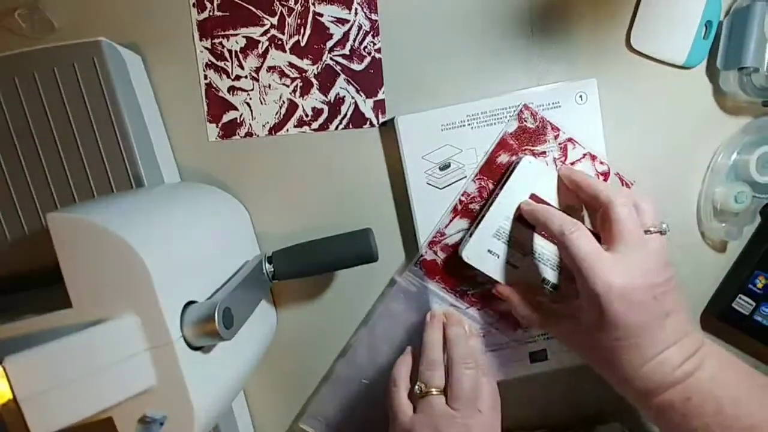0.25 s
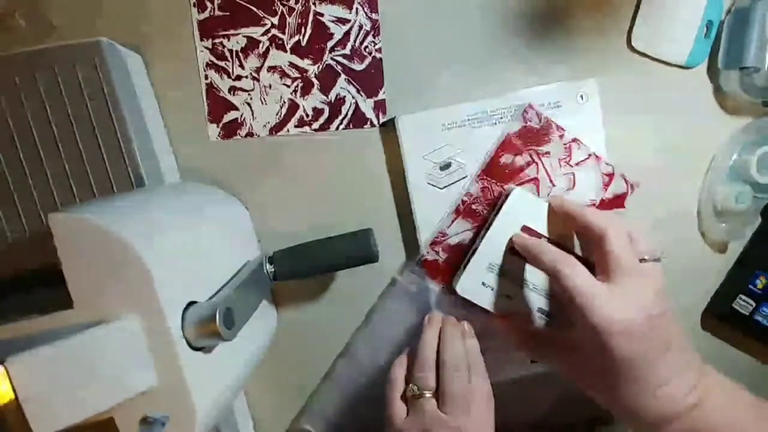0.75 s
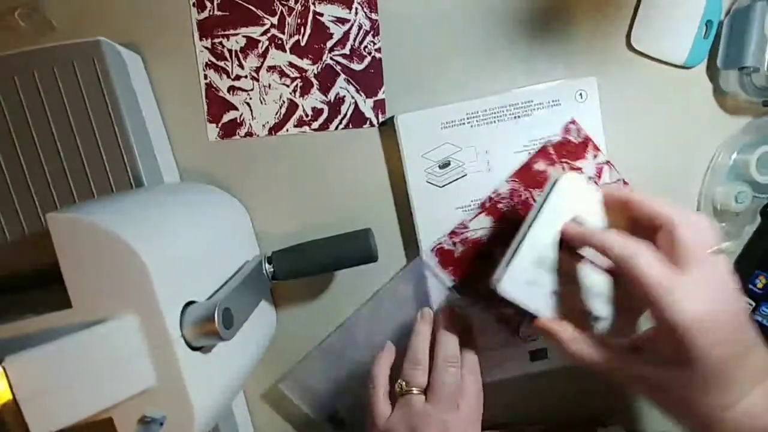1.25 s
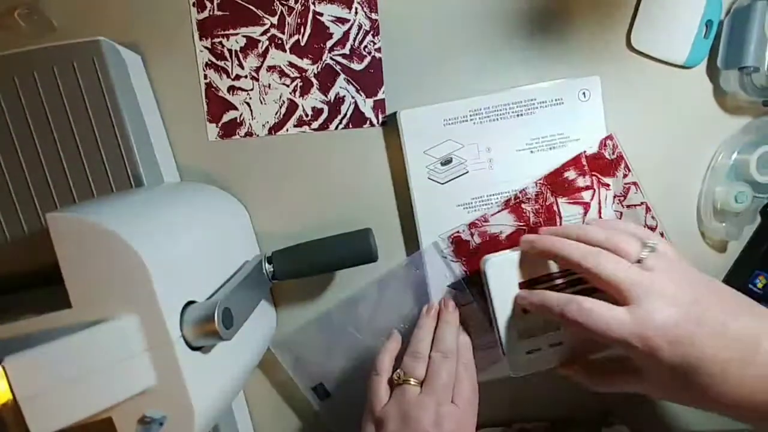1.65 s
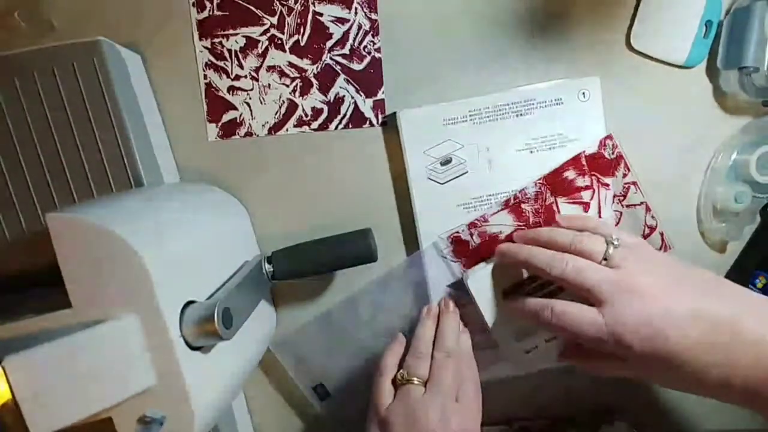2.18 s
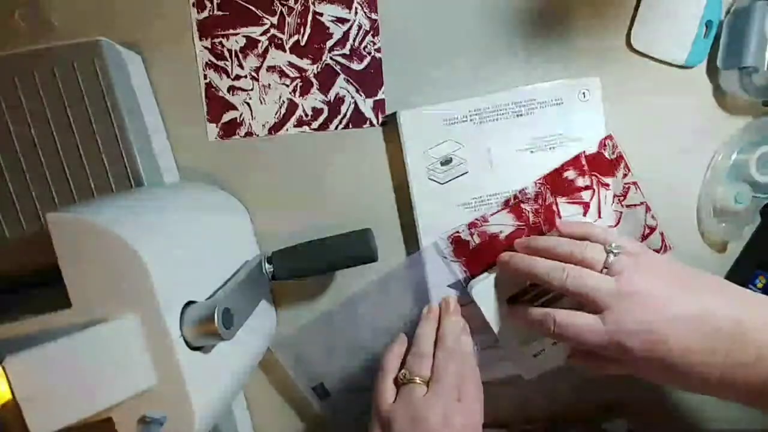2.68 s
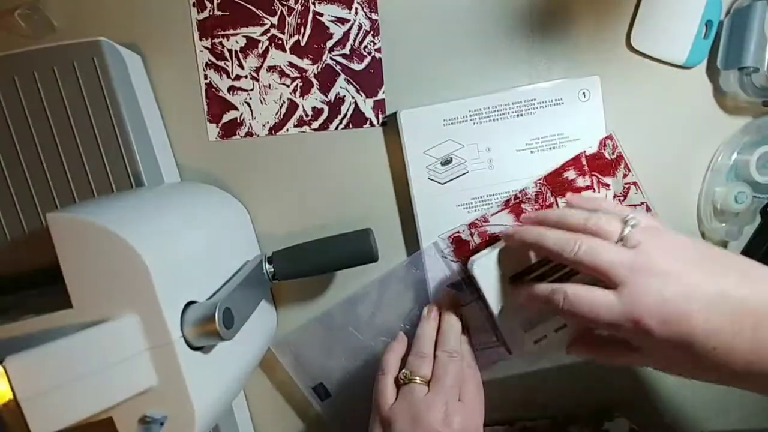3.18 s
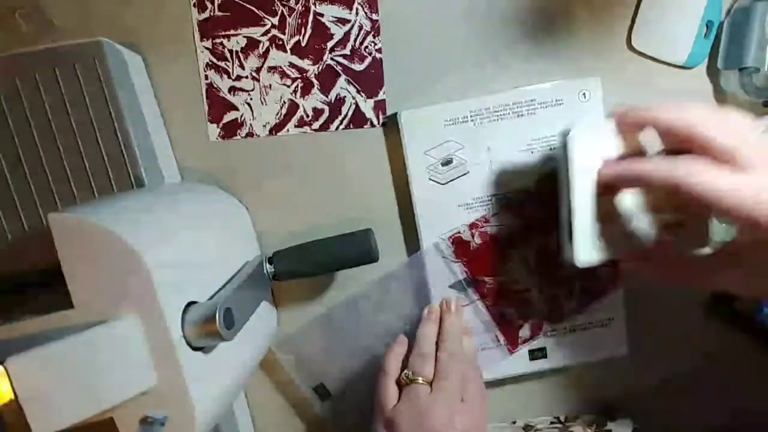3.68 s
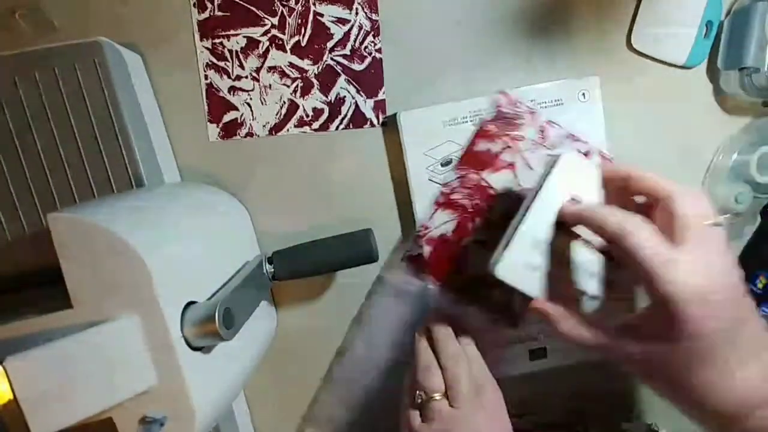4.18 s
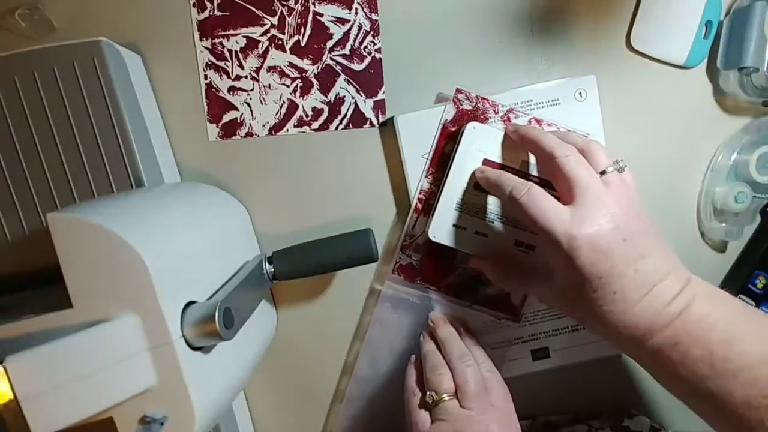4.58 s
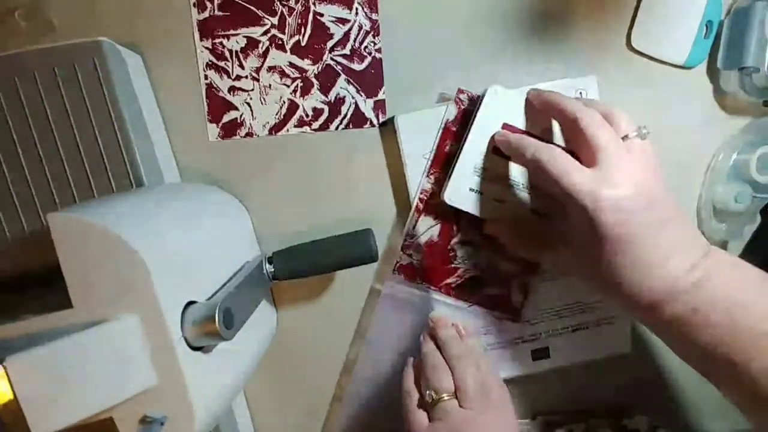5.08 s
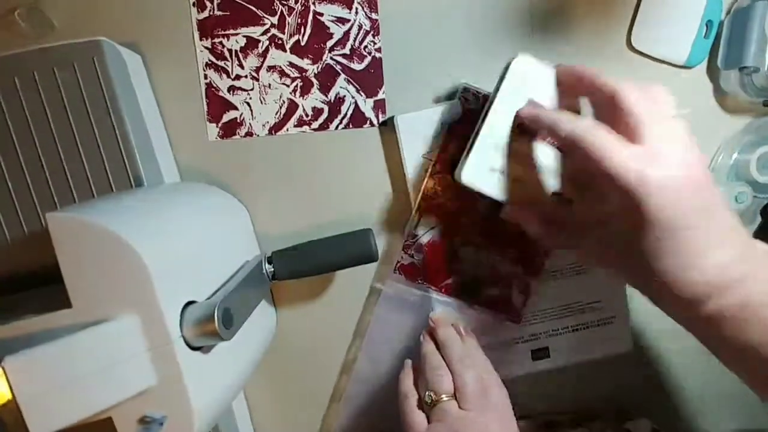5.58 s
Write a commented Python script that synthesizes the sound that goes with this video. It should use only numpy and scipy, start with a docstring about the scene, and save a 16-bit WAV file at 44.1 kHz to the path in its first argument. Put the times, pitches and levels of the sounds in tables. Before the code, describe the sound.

Irregular tapping of a felt pad in a hard case on thin plastic over a table. Early presses are muffled and low, later ones sharper and more separate, with a bright clack just after three seconds and the strongest thump past five. Small peeling crackles and light sliding rustles fill gaps. Near, fairly dry, small room, slightly dull recording with faint hum.

```python
"""An ink pad in a plastic case is pressed again and again onto a plastic embossing folder on a craft table:
each contact strikes decaying sheet modes, with a felt rustle; each push rings table and case resonators.
The sticky felt peels with a crackle of random snaps; filtered grains make the sliding hiss.
Behind lie a noise murmur, a faint sine hum and, near the end, a thin tone of gently shifting pitch."""
import sys
import numpy as np
from scipy import signal
from scipy.fft import rfft, irfft, next_fast_len
from scipy.io import wavfile

SR = 44100
rng = np.random.default_rng(int(sys.argv[2]) if len(sys.argv) > 2 else 0)


def persist_wave(psi):
    """Save psi, clipped to +-1, as 16-bit WAV."""
    counts = np.round(np.clip(psi, -1, 1) * 32767).astype(np.int16)
    wavfile.write(sys.argv[1], SR, np.atleast_2d(counts).T)


N = 257779

# Contacts on the sheet. Each row: start in seconds, relative level in dB, brightness in dB,
# pitch of the spot in Hz.
CLICK_ROWS = [(0.1911, -28.5, -13, 1200), (0.2286, -62.5, 12, 5160), (0.398, -55, -17, 1520),
              (0.4552, -37, -4, 1640), (0.5708, -30.5, -14.5, 1295), (0.625, -52, -21.5, 920),
              (0.6496, -66, -9.5, 1120), (0.673, -58.5, -24, 1340), (0.8097, -41.5, -27, 2380),
              (0.8226, -43.5, -19, 2500), (0.9094, -57, -13, 2150), (0.9308, -53, -31, 1080),
              (1.0884, -57, -11, 1460), (1.1522, -42, -15, 1410), (1.1623, -46, 2, 1690),
              (1.2528, -49, -21, 1520), (1.2733, -30, -7, 1410), (1.4075, -36.5, -21, 960),
              (1.4807, -56, 4, 982), (1.8639, -38, -11.5, 1210), (2.063, -65.5, -30, 902),
              (2.2399, -40.5, -22.5, 1650), (2.2926, -57.5, -7, 1100), (2.622, -26, -6.5, 2110),
              (2.9542, -28.5, -14.5, 1804), (3.3266, -20.5, -4, 3324), (3.339, -61, 12, 3490),
              (3.5109, -39.5, -10, 1430), (3.524, -34, -20, 1670), (3.612, -26.5, -23.5, 1900),
              (3.8294, -56.5, -28, 1410), (4.0417, -37.5, -23, 2140), (4.126, -57, -35, 1710),
              (4.2365, -53.5, -34, 1490), (4.2588, -62.5, 17.5, 5400), (4.5978, -29.5, -27.5, 1930),
              (4.719, -67, 30.5, 902), (4.8546, -37.5, -15, 1990), (5.036, -25, -32, 1968),
              (5.3087, -61.5, -24, 929), (5.3786, -17.5, -13.5, 1240), (5.5999, -39, -29, 1154)]
# Pushes into the table top. Each row: start in seconds, board drive in dB, deep drive in dB,
# case knock drive in dB, contact time in ms.
PUSH_ROWS = [(0.029, -64.5, -45, -53.5, 15), (0.185, -25.5, -32, -37, 13.5), (0.199, -24, -36, -32, 22.3),
             (0.567, -24, -32.5, -40.5, 6), (.576, -18, -38, -39.5, 29.2), (.66, -46, -52, -59.5, 25),
             (0.81, -46.5, -58, -47.5, 4.6), (0.917, -41.5, -29.5, -56, 36.4), (1.07, -35.5, -64, -55, 44),
             (1.119, -31.5, -63, -41.5, 28), (1.154, -43, -60, -47, 2.7), (1.273, -42, -43.5, -51.5, 5.9),
             (1.406, -53, -51, -33, 4.6), (1.418, -57, -66, -39, 12.1), (1.48, -54.5, -60, -61, 8),
             (1.852, -42.5, -30.5, -50.5, 5.56), (1.866, -31.5, -48, -41.5, 8.8),
             (2.158, -47.5, -54, -59.5, 26.2), (2.289, -41, -46.5, -59, 12), (2.515, -52, -58, -62, 29),
             (2.623, -41, -43.5, -43, 3.76), (2.826, -51, -64, -56, 25.5), (2.955, -39.5, -45.5, -44, 4.5),
             (2.975, -41, -55, -56, 28), (3.325, -26, -29.5, -34, 6.3), (3.509, -46.5, -46, -54, 36),
             (3.612, -41, -40, -56.5, 7.5), (4.139, -48.5, -78, -69, 25), (4.599, -37.5, -39.5, -43.5, 9),
             (4.617, -37, -53.5, -42, 16.6), (4.855, -54, -58.5, -58, 21), (5.037, -17.5, -26.5, -28, 7.1),
             (5.136, -60, -45.5, -69.5, 47), (5.245, -30.5, -68, -52, 94), (5.381, -11.5, -26.5, -19, 3.78),
             (5.599, -33.5, -43, -48.5, 45), (5.655, -62, -46.5, -65.5, 24)]
# Felt peeling off the ink. Each row: start in seconds, end in seconds, level in dB, pitch of the hollow in Hz.
PEEL_ROWS = [(0.042, 0.064, -57, 2110), (0.452, 0.458, -50.5, 1650), (0.808, 0.83, -52.5, 2220),
             (1.13, 1.176, -61, 1560), (2.176, 2.185, -56, 1980), (2.523, 2.538, -56, 2330),
             (2.832, 2.864, -54, 2150), (3.505, 3.537, -58, 1650), (4.854, 4.878, -56.5, 1900),
             (5.222, 5.264, -55.5, 1900), (5.565, 5.607, -53.5, 1900)]
# Folder and hands sliding over paper. Each row: start in seconds, end in seconds, hiss level in dB.
STROKE_ROWS = [(0.21, 0.398, -81), (0.995, 1.206, -85), (1.29, 1.4, -71.5), (2.14, 2.25, -90),
               (2.574, 2.673, -104), (3.856, 4.064, -75), (4.183, 4.257, -71.5), (4.298, 4.6, -86)]
# Track of the thin tone. Each row: time in seconds, pitch in Hz, level in dB rms.
TONE_TRACK = [(5.17, 634, -69), (5.4, 640, -73), (5.6, 658, -70), (5.84, 652, -85)]
# Deepest table modes. Each row: nominal pitch in Hz, level in dB, undamped 60 dB decay in seconds.
DEEP_MODES = [(72.2, 1.5, 0.28), (83.54, 7.5, 0.18)]
# Table board modes. Each row: nominal pitch in Hz, level in dB, undamped 60 dB decay in seconds.
BOARD_MODES = [(134.2, -11.5, 0.21), (163, 0, 0.17), (140, -5, 0.075), (189, -19, 0.19),
               (233.4, -22.5, 0.25)]
# Plastic case modes. Each row: nominal pitch in Hz, level in dB, 60 dB decay in seconds.
CASE_MODES = [(257.7, -13, 0.23), (329.4, -8, 0.072), (422, -4.5, 0.044), (534, -11.5, 0.049),
              (443, -14.5, 0.058), (579, -8, 0.047), (640, -11.5, 0.084), (729, -8, 0.063),
              (800, -10.5, 0.043), (910, -12.5, 0.055), (991, -8.5, 0.092), (1024, -8, 0.038),
              (1152, -5, 0.07)]
# Plastic sheet modes. Each row: nominal pitch in Hz, level in dB, 60 dB decay in seconds.
SHEET_MODES = [(888, -5.5, 0.027), (1200, -5, 0.042), (1410, -2.5, 0.032), (1650, 3, 0.018),
               (1900, -1.5, 0.016), (2150, 4, 0.012), (2458, 4, 0.018), (2913, -7.5, 0.022),
               (3150, 0, 0.015), (3700, 0, 0.0075), (4440, -3.5, 0.01), (4587, -8, 0.024),
               (5097, -3, 0.0097), (5640, -10.5, 0.0081), (7400, -14, 0.024), (8300, -8.5, 0.022),
               (9490, -20, 0.0045), (10700, -29.5, .01)]
# Whistles of the ridged sheet. Each row: pitch in Hz, level in dB, 60 dB decay in seconds.
WHISTLES = [(2150, -6, .014), (3350, -12, .014), (5500, -16, .008)]
# Colour of the felt. Each row: frequency in Hz, relative density in dB per Hz.
FELT_SPECTRUM = [(600, 2.5), (900, -6.5), (1300, -3), (1700, -4), (2100, -0.5), (2700, -1.5), (3400, -10.5),
                 (4500, -10), (5700, -11.5), (8000, -15.5), (10500, -25.5), (13000, -52)]
# Colour of plastic on paper. Each row: frequency in Hz, relative density in dB per Hz.
PAPER_SPECTRUM = [(700, -14.5), (1000, -9), (1400, -3), (1750, -10.5), (2150, -3), (2700, -6.5),
                  (3400, -8.5), (4500, -6), (5700, -10), (8000, -13), (10500, -15), (13000, -23)]
# Colour of the room murmur. Each row: frequency in Hz, relative density in dB per Hz.
ROOM_SPECTRUM = [(28, -9.5), (50, 4), (80, -4.5), (140, 3.5), (240, -5), (330, -7), (550, -11),
                 (800, -12.5), (1200, -21.5), (2000, -24), (3300, -26.5), (5300, -33), (8300, -29),
                 (11000, -33), (14000, -29)]
# Left-right likeness of the murmur. Each row: frequency in Hz, likeness from 0 to 1.
LIKENESS = [(30, 0.48), (300, 0.26), (1000, 0.086), (4000, 0.3), (12000, .02)]
# Mains hum. Each row: pitch in Hz, mean level in dB rms.
HUM_ROWS = [(121, -76), (242, -78)]


def from_db(db):
    """Decibels to an amplitude factor."""
    return 10 ** (np.asarray(db) / 20)


def rms_one(x):
    """Scale to an rms of 1."""
    return x / np.sqrt(np.mean(x ** 2) + 1e-20)


def in_time(rows):
    """Columns of a track, interpolated at every sample."""
    s, *columns = np.transpose(rows)
    return [np.interp(np.arange(N) / SR, s, c) for c in columns]


def at_hz(points, hz):
    """Value of a curve at hz, on a log frequency axis."""
    curve_hz, values = np.array(points).T[:2]
    return np.interp(np.log(hz), np.log(curve_hz), values)


def add(out, x, s):
    """Mix a short sound in at time s."""
    at = round(s * SR)
    out[..., at:at + x.shape[-1]] += x[..., :N - at]


def impulses(s, sizes):
    """Near-silence with one sample set at each time."""
    out = np.full(N, 1e-18)
    np.add.at(out, np.round(np.asarray(s) * SR).astype(int), sizes)
    return out


def drift(rate_hz):
    """Slow random signal of rms 1: noise through two equal poles, computed at SR / 40."""
    r = np.exp(-2 * np.pi * rate_hz * 40 / SR)
    noise = rng.standard_normal(N // 40 + 2002)
    slow = signal.lfilter([1], [1, -2 * r, r * r], noise)[2000:]
    return np.interp(np.arange(N) / 40, np.arange(len(slow)), rms_one(slow))


def decay(x, t60_s):
    """Each sample of x starts an exponential decay."""
    return signal.lfilter([1], [1, -from_db(-60 / (t60_s * SR))], x)


def ring(x, hz, t60_s):
    """Two-pole resonator: a unit click starts a decaying sine of initial height 1."""
    r, w = from_db(-60 / (t60_s * SR)), 2 * np.pi * hz / SR
    return signal.lfilter([0, np.sin(w)], [1, -2 * r * np.cos(w), r * r], x)


def coloured(sources, spectrum, likeness=None):
    """Third-octave bank fed by two sources in turn; with likeness each source is a mid and a side row."""
    out, edges_hz = 0, 25 * 2 ** np.arange(0, 9.4, 1 / 3)
    for k, (low, high) in enumerate(zip(edges_hz, edges_hz[1:])):
        hz = np.sqrt(low * high)
        if hz < spectrum[0][0]:
            continue
        bandpass = signal.butter(2, [low, high], "band", fs=SR, output="sos")
        band = signal.sosfilt(bandpass, sources[k % 2])
        if likeness:
            alike = np.clip(at_hz(likeness, hz), 0, 1)
            band = np.sqrt(1 + alike) * band[0] + np.sqrt(1 - alike) * band[1] * [[1], [-1]]
        out = out + from_db(at_hz(spectrum, hz)) * band
    return rms_one(out)


def grains(per_s, spread_db):
    """Two unrelated streams of tiny random snaps."""
    size_db = spread_db * np.minimum(rng.exponential(1, (2, N)), 4)
    sizes = from_db(size_db) * rng.choice([-1, 1], (2, N))
    return sizes * (rng.random((2, N)) < per_s / SR) + 1e-18


def placed(x, pan_db=0., extra_s=0.):
    """Stereo by level and lag: the left port hears x late; a negative pan favours the right."""
    lag_s = 0.00006 + extra_s
    n = np.arange(len(x))
    late = np.interp(n - lag_s * SR, n, x)
    return np.array([late * from_db(pan_db / 2), x * from_db(-pan_db / 2)])


def room_tone():
    """Broad murmur of the house as coloured noise, a wavering mains hum and a thin gliding sine."""
    murmur = coloured(rng.standard_normal((2, 2, N)), ROOM_SPECTRUM, LIKENESS)
    out = from_db(-68 + 0.27 * drift(4.6)) * murmur
    t = np.arange(N) / SR
    for hz, rms_db in HUM_ROWS:
        out = out + np.sqrt(2) * from_db(rms_db + 0.92 * drift(3.6)) * np.sin(2 * np.pi * hz * t)
    hz, rms_db = in_time(TONE_TRACK)
    fade_in = np.clip((t - TONE_TRACK[0][0]) / 0.083, 0, 1)
    tone = np.sin(2 * np.pi * np.cumsum(hz) / SR)
    return out + np.sqrt(2) * fade_in * from_db(rms_db) * tone


def walls(x):
    """Room reflections: six feedback delays a side, duller on every round."""
    t60_s, cut_hz = 0.14, 3500
    size = next_fast_len(N + SR)
    w = 2 * np.pi * np.arange(size // 2 + 1) / size
    dull = 1 / (1 + 1j * w * SR / (2 * np.pi * cut_hz))
    out = np.zeros((2, len(w)), complex)
    for k, lag_s in enumerate(rng.uniform(.009, 0.031, 12)):
        loop = from_db(-60 * lag_s / t60_s) * dull * np.exp(-1j * w * lag_s * SR)
        out[k % 2] += loop / (1 - loop) * (-1) ** (k // 2)
    return irfft(out * rfft(x, size), size)[:, :N]


def shake():
    """Slowly varying random force keeps the table's low modes stirring, most after a hard push."""
    rest_db, stir_db, stir_t60_s = -73, -28.5, 0.89
    force = rng.standard_normal(N) * from_db(4.6 * drift(3.6))
    stir = sum(from_db(db) * ring(force, hz, t60_s) for hz, db, t60_s in DEEP_MODES + BOARD_MODES)
    s, board_db, *_ = np.transpose(PUSH_ROWS)
    after = decay(impulses(s, from_db(board_db + stir_db)), stir_t60_s)
    return placed(rms_one(stir) * (after + from_db(rest_db)), -0.42)


def slide():
    """Plastic on paper hisses, grainy and uneven, with faint whistles from the ridged sheet."""
    rise_db_per_s, fall_db_per_s, fidget_db = 300, 128, -94
    hiss = coloured(grains(6600, spread_db=4.5), PAPER_SPECTRUM)
    for hz, db, t60_s in WHISTLES:
        hiss = hiss + from_db(db) * rms_one(ring(rng.standard_normal(N), hz, t60_s))
    t = np.arange(N) / SR
    strokes = np.zeros(N)
    for start, end, db in STROKE_ROWS:
        loss_db = np.maximum(rise_db_per_s * (start - t), fall_db_per_s * (t - end)).clip(0)
        strokes += from_db(db - loss_db)
    return placed(hiss * (strokes + from_db(fidget_db)) * from_db(2.0 * drift(13)), -4.3)


def peels():
    """Ink threads snap in clumps; part of the crackle gathers in a hollow under the lifting pad."""
    rise_db_per_s, fall_db_per_s = 1005.8, 940
    clumps = from_db(2.9 * drift(120))
    crackle = coloured(grains(900, spread_db=4.0) * clumps, FELT_SPECTRUM)
    t, out = np.arange(N) / SR, np.zeros(N)
    for start, end, level_db, hollow_hz in PEEL_ROWS:
        span = slice(max(round((start - .05) * SR), 0), round((end + 0.17) * SR))
        hollow = rms_one(ring(crackle[span], hollow_hz, .008))
        loss_db = np.maximum(rise_db_per_s * (start - t[span]), fall_db_per_s * (t[span] - end)).clip(0)
        out[span] += from_db(level_db - loss_db) * (0.67 * crackle[span] + 0.48 * hollow)
    return placed(out, -4.0)


def table_ring(push, t, board_db, deep_db, held, luck):
    """A push rocking at a mode's pitch makes the ring swell instead of cancelling."""
    sway = push * np.cos(2 * np.pi * BOARD_MODES[1][0] * t)
    out = np.zeros(len(t))
    for k, (hz, db, t60_s) in enumerate(BOARD_MODES):
        bent_hz = hz * (1 + 0.014 * luck[2, -1 - k])
        out += from_db(board_db + db + 1.5 * luck[0, k]) * ring(sway, bent_hz, t60_s * held)
    for k, (hz, db, t60_s) in enumerate(DEEP_MODES):
        bent_hz = hz * (1 + 0.1 * luck[1, -1 - k])
        deep_sway = push * np.cos(2 * np.pi * bent_hz * t)
        out += from_db(deep_db + db + 2.2 * luck[0, -1 - k]) * ring(deep_sway, bent_hz, t60_s * held)
    return out


def thuds():
    """A soft push rings the table; the case rattles, most in the modes near where it is struck."""
    out, size = np.zeros((2, N)), SR // 2
    t = np.arange(size) / SR
    # after a sharp blow the hand settles once more
    sharp_under_ms, settle_s, settle_ms = 8, 0.085, 20
    settle_db = (-27, -23.5, -30.5)      # board, deep, case
    settles = [(s + settle_s, *np.add(levels, settle_db), settle_ms)
               for s, *levels, ms in PUSH_ROWS if ms < sharp_under_ms]
    pushes = PUSH_ROWS + settles
    chance = rng.standard_normal((len(pushes), 3, 24))
    shape = (len(pushes), size)
    rattles = rng.standard_normal(shape) * (rng.random(shape) < 350 / SR)
    for (s, board_db, deep_db, case_db, contact_ms), luck, rattle in zip(pushes, chance, rattles):
        # the more a blow catches the case rather than the board, the higher the knock
        knock_hz = 420 * 2 ** (.026 * (case_db - board_db + 10))
        length = int(np.clip(contact_ms, 1, 90) * SR / 1000)
        held = 1.127 / (1 + contact_ms / 40)      # a hand that stays down damps the ring
        push = np.zeros(size)
        push[:length] = 2 * np.hanning(length) / np.hanning(length).sum()
        add(out, placed(table_ring(push, t, board_db, deep_db, held, luck), -0.73), s)
        front = 0.8 * rattle * from_db(-60 * t / 0.15)
        front[length // 4] += 1
        front = signal.lfilter([.15], [1, -.85], front)
        for k, (hz, db, t60_s) in enumerate(CASE_MODES):
            size_db = case_db + db - 15.9 * np.log2(hz / knock_hz) ** 2 + 2.0 * luck[0, 5 + k]
            knock = from_db(size_db) * ring(front, hz * (1 + 0.037 * luck[1, k]), t60_s)
            pan_db, extra_s = -.8 + 2.0 * luck[2, k], 0.0002 * luck[0, -3 - k % 2]
            add(out, placed(knock, pan_db, extra_s), s)
    return out


def felt_rustle():
    """A faint noise swells just before each contact, then felt rustles on after it."""
    s, level_db, *_ = np.transpose(CLICK_ROWS)
    landings = impulses(s, from_db(-52.5 + 0.86 * (level_db + 28.5)))
    tail = decay(landings, .14)
    lead_in = from_db(-11) * decay(landings[::-1], .075)[::-1]
    rough = from_db(3.5 * drift(120)) * coloured(grains(4000, spread_db=6.0), FELT_SPECTRUM)
    return placed((tail + lead_in) * rough, -2.0)


def clicks():
    """The pad lands unevenly: a firm and three weaker contacts strike sheet modes, most near the spot's pitch."""
    hz, mode_db, t60_s = np.transpose(SHEET_MODES)
    out, t = np.zeros((2, N)), np.arange(SR // 16) / SR
    chance = rng.standard_normal((len(CLICK_ROWS), 6, len(SHEET_MODES)))
    lags_s = rng.uniform(0, .009, (len(CLICK_ROWS), 3))
    for (s, level_db, bright_db, spot_hz), luck, lag_s in zip(CLICK_ROWS, chance, lags_s):
        bent_hz = hz * (1 + 0.047 * luck[0])      # fingers and pad bend the sheet differently each time
        tilt_db = (bright_db + 14.5) * 0.54 * np.log2(np.minimum(hz, 5500) / 2100)
        near_db = 9.9 * np.exp(-(np.log2(hz / spot_hz) / 0.15) ** 2)
        sizes = from_db(level_db + mode_db + tilt_db + near_db - 13.5 + 2 * luck[1])
        rings = np.sin(2 * np.pi * bent_hz[:, None] * t) * from_db(-60 * t / t60_s[:, None])
        sides = sizes * from_db(2 * luck[2] * [[1], [-1]])
        add(out, (sides * (-1) ** np.arange(len(hz))) @ rings, s)
        for strength, late_s in zip(luck[3:], lag_s):
            add(out, (0.15 * sides * strength) @ rings, s + .0004 + late_s)
    return np.array([placed(out[0], -1.6)[0], placed(out[1], -0.88)[1]])


def scene():
    """Near sounds with their wall reflections, over the stirring table and the room."""
    near = clicks() + felt_rustle() + thuds() + peels() + slide()
    wet_db = -13.5
    return near + from_db(wet_db) * walls(near.mean(axis=0)) + shake() + room_tone()


def top_cut(x):
    """Nothing passes above the cut-off."""
    return signal.sosfilt(signal.butter(12, 12300, fs=SR, output="sos"), x)


def record(dry):
    """Two microphone ports lose bass unequally, then share a rumble cut, treble roll-off, step and dip."""
    bass_cut_hz = (82, 31.6)      # left, right
    rumble_cut_hz, top_hz = 37.4, 11400
    step_hz, step_db = 6400, -4.5
    dip_hz, dip_width_hz, dip_db = 6460, 780, -6
    ports = np.array([signal.sosfilt(signal.butter(2, hz, "high", fs=SR, output="sos"), x)
                      for hz, x in zip(bass_cut_hz, dry)])
    ports = signal.sosfilt(signal.butter(2, rumble_cut_hz, "high", fs=SR, output="sos"), ports)
    ports = signal.sosfilt(signal.butter(4, top_hz, fs=SR, output="sos"), ports)
    low = signal.sosfiltfilt(signal.butter(10, step_hz, fs=SR, output="sos"), ports)
    ports = low + from_db(step_db) * (ports - low)
    edges_hz = [dip_hz - dip_width_hz / 2, dip_hz + dip_width_hz / 2]
    notched = signal.sosfilt(signal.butter(2, edges_hz, "bandstop", fs=SR, output="sos"), ports)
    ports = notched + from_db(dip_db) * (ports - notched)
    return top_cut(ports)


dry = scene()
out = record(dry)
persist_wave(out)
```